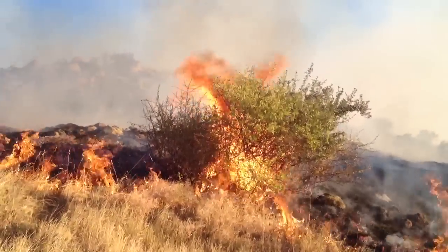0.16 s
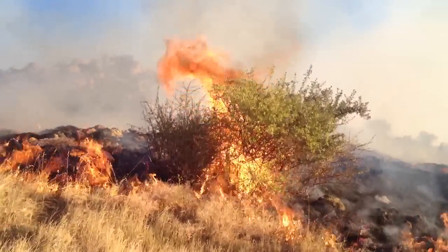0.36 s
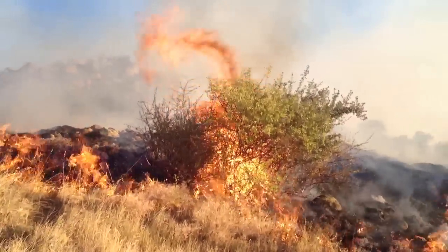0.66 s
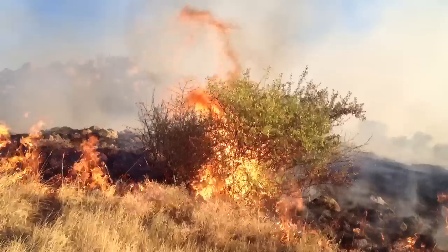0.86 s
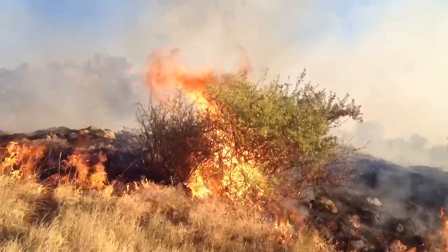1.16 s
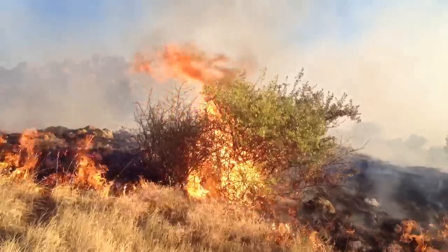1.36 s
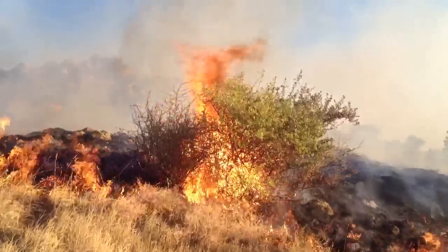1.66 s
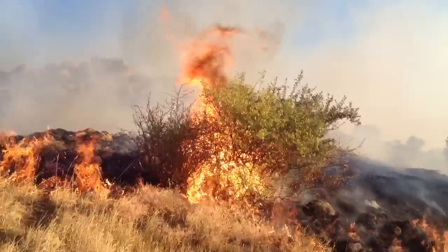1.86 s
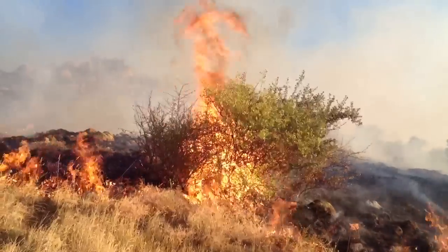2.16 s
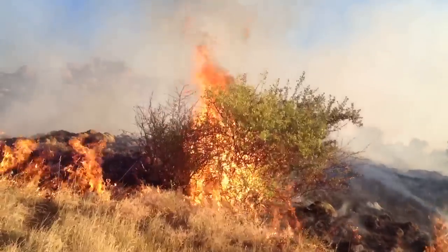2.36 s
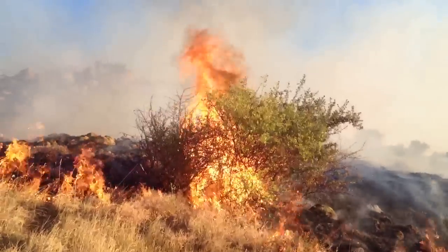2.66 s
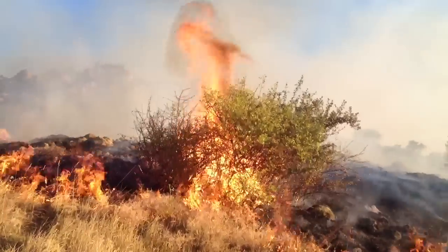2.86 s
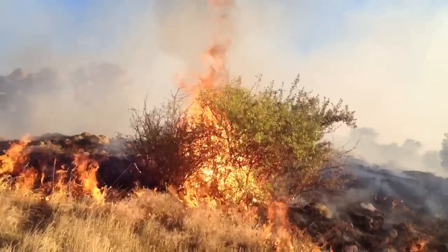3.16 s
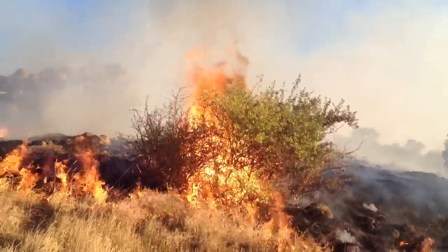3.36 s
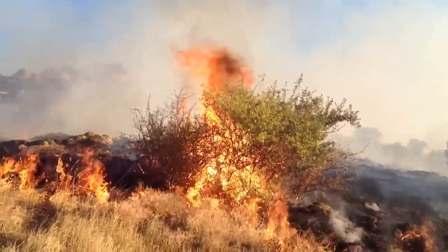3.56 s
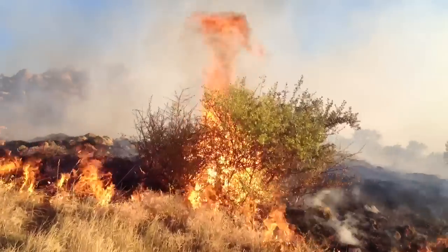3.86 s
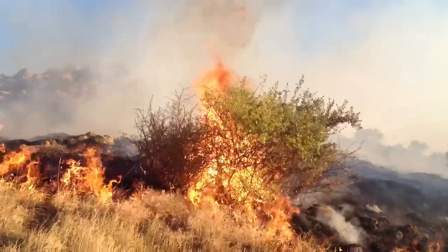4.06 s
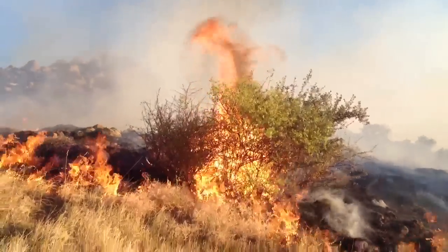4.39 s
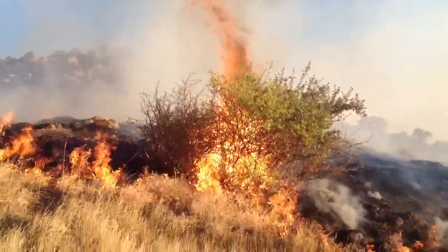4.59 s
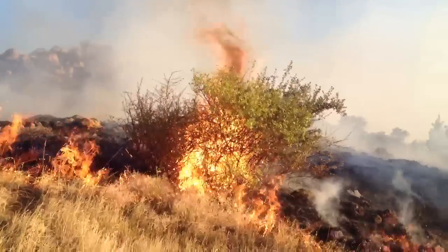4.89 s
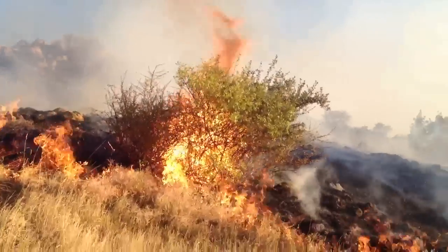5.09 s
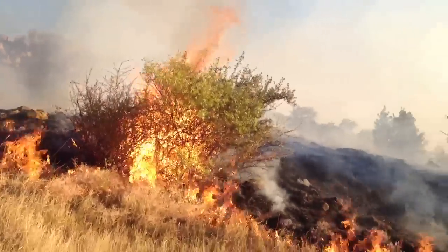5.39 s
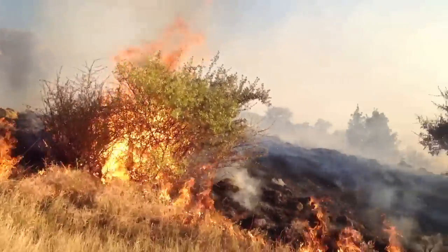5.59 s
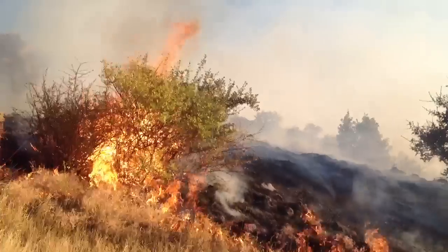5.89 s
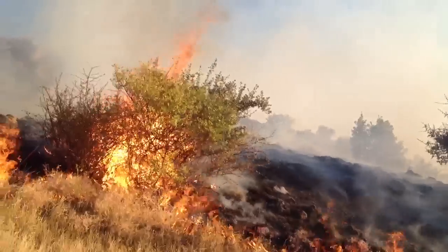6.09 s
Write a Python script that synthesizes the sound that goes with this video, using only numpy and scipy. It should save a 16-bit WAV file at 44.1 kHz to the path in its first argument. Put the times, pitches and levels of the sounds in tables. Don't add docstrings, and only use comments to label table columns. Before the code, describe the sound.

A continuous brush fire with no beginning or end: fast, crisp crackling, sizzling hiss and faint low flame flutter. The crackle starts strongest, eases, then swells and dips in flurries. Single stems pop and thicker twigs knock sharply, more often from three and a half seconds onward. The outdoor sound is dry and bright, mono from a phone, its colour changing slightly as it turns aside near the end.

```python
import sys
import numpy as np
from scipy import signal
from scipy.fft import rfft, irfft
from scipy.io import wavfile
from scipy.ndimage import uniform_filter1d

SR = 44100
rng = np.random.default_rng(int(sys.argv[2]) if len(sys.argv) > 2 else 0)


def persist_wave(psi):
    counts = np.round(np.clip(psi, -1, 1) * 32767).astype(np.int16)
    wavfile.write(sys.argv[1], SR, np.atleast_2d(counts).T)


def attenuation_scalar(level_db):
    decades = np.asarray(level_db, float) / 20
    return 10 ** decades


N = 275184
CRACK_N, LEAD_N = 1024, 128


def fire_db(s):
    # t/s, crackle/dB, flame/dB
    burning = [(0.0, -38, -51.5), (0.54, -43, -51), (0.82, -41, -51.5), (0.96, -46.5, -60),
               (1.34, -43.5, -53), (1.72, -43.5, -55.5), (2.12, -41.5, -51), (2.29, -39.5, -52),
               (2.52, -45.5, -50.5), (2.75, -44, -51.5), (3.37, -43, -52.5), (3.84, -42, -53.5),
               (4.64, -40.5, -51), (4.81, -41.5, -51), (5.2, -43, -50.5), (5.6, -41.5, -50.5),
               (5.91, -44, -51.5), (6.24, -42.5, -52)]
    at_s, fierce_db, flame_db = np.transpose(burning)
    return np.interp(s, at_s, fierce_db), np.interp(s, at_s, flame_db)


def bursts(count, crack_s, tail_s, tail_db, echo_s, echo_db, swell_db):
    t = (np.arange(CRACK_N) - LEAD_N) / SR
    vary = np.exp(0.3 * rng.standard_normal((count, 3)))
    noise = rng.standard_normal((count, 2, CRACK_N))
    noise[:, 0, LEAD_N] = 2 * np.sign(noise[:, 0, LEAD_N])
    tear = (t >= 0) * np.exp(-abs(t) / (crack_s * vary[:, :1])) * noise[:, 0]
    bounce = np.array([np.roll(one, int(echo_s * k * SR)) for one, k in zip(tear, vary[:, 2])])
    scatter = attenuation_scalar(tail_db) * np.exp(-abs(t) / (tail_s * vary[:, 1:2]))
    swell = attenuation_scalar(swell_db) * np.exp(-abs(t) / 0.00078)
    return tear + attenuation_scalar(echo_db) * bounce + np.where(t < 0, swell, scatter) * noise[:, 1]


def crackle(per_s, spread_db, cap_db, kinds=12):
    out = 0
    flurry = attenuation_scalar(3 * walk(12))
    for shape in bursts(kinds, crack_s=0.0002, tail_s=0.0025, tail_db=-8, echo_s=0.002, echo_db=-7, swell_db=-13):
        fired = rng.random(N) < per_s / kinds / SR * flurry
        size = attenuation_scalar(np.minimum(spread_db * rng.exponential(size=N), cap_db))
        centre_hz = min(4000 * np.exp(0.78 * rng.standard_normal()), 9000)
        tint = shape + 1.3 * band(shape, centre_hz / 1.03, centre_hz * 1.55)
        out = out + signal.oaconvolve(fired * size, tint / np.linalg.norm(tint))[:N]
    return out


def snaps(s, levels_db, bands_hz, trim_db, crack_s, tail_db, knock_hz):
    cracks = bursts(len(s), crack_s, 0.0026, tail_db, echo_s=0.0018, echo_db=-11, swell_db=-21)
    cracks = port(cracks, s[:, None])
    for one, hz in zip(cracks, knock_hz):
        one += 5 * band(one, hz / 1.42, hz * 1.36, order=1)
    sound = 0
    for (lo_hz, hi_hz), db, trim in zip(bands_hz, levels_db, trim_db):
        part = band(cracks, lo_hz, hi_hz, order=2 if lo_hz < 1000 else 3)
        rms = np.sqrt(np.sum(part[:, :LEAD_N + SR // 230] ** 2, axis=1) * 200 / SR)
        sound = sound + part * (attenuation_scalar(db + trim) / rms)[:, None]
    out = np.zeros(N + CRACK_N)
    for at, one in zip((s * SR).astype(int), sound):
        out[at:at + CRACK_N] += one
    return out[LEAD_N:N + LEAD_N]


def far_stalks():
    count, scatter_db = 170, 2
    chance = rng.random((count, 3))
    s = (np.arange(count) + 2 * chance[:, 0]) / (count + 2) * N / SR
    fierce_db, _ = fire_db(s)
    aside = turned(s)
    body_db = fierce_db - 6.5 + 4 * aside + scatter_db * (4 * chance[:, 1] - 2)
    treble_db = fierce_db + 2.5 - 0.5 * aside + scatter_db * (4 * chance[:, 2] - 2)
    return np.transpose([s, body_db, treble_db])


def stalks():
    # t/s, body/dB, treble/dB
    near_stems = [(0.2853, -39.5, -32), (0.4304, -42, -36), (0.7891, -44, -33.5), (2.0751, -46, -28),
                  (2.2315, -41, -32.5), (2.2414, -51, -32), (2.2986, -41, -35), (2.3149, -46, -31.5),
                  (2.3389, -39, -32), (2.3595, -37, -34), (2.4872, -39.5, -34), (3.2443, -40, -31.5),
                  (3.7514, -48, -30.5), (3.8028, -39.5, -27), (3.8383, -38.5, -38), (3.9969, -50, -31.5),
                  (4.1427, -41, -33), (4.4232, -39.5, -34.5), (4.4613, -39, -36), (4.6603, -35.5, -35),
                  (4.7201, -40, -45), (4.9518, -32, -32), (5.2295, -32.5, -33), (5.4176, -36.5, -38),
                  (5.4664, -39, -32), (5.5246, -37, -40), (5.5517, -38.5, -51), (5.7548, -37, -33),
                  (6.0417, -41, -36), (6.1329, -36.5, -29.5),
                  (0.0224, -42, -54), (0.1551, -48, -39), (0.2287, -50, -39), (1.0093, -43.5, -39.5),
                   (1.2598, -49, -35.5), (1.2739, -45, -44), (1.6142, -43, -35), (1.6832, -45, -33.5),
                   (1.779, -43, -33), (1.8186, -44, -49), (5.762, -41, -38), (2.1736, -45, -34.5),
                   (2.1998, -47, -36), (2.3215, -50, -34), (2.4318, -41, -37), (2.5062, -54, -34),
                   (2.7028, -47, -33), (2.977, -40.5, -37), (4.9155, -48, -36), (3.075, -49, -34),
                   (3.229, -55, -38), (3.3225, -42, -36), (3.4877, -47, -39), (3.6996, -49, -37),
                   (4.6243, -36, -37), (4.7707, -39.5, -38.5), (4.8136, -43.5, -35), (5.4575, -43, -36),
                   (5.7884, -43, -36), (6.1549, -41, -40)]
    # low edge f/Hz, high edge f/Hz
    bands_hz = [
        (1400, 6500),
        (6500, 15400),
    ]
    s, *levels_db = np.vstack([near_stems, far_stalks()]).T
    ring_hz = 1700 * 3.5 ** rng.random(len(s))
    return snaps(s, levels_db, bands_hz, [2.2, 1.5], crack_s=0.00022, tail_db=-12, knock_hz=ring_hz)


def twigs():
    # t/s, knock f/Hz, knock/dB, crack/dB, tick/dB
    thick_twigs = [(0.1265, 1770, -34, -55, -53), (0.3218, 2010, -36.5, -38, -29),
                   (0.4927, 1890, -38, -36.5, -30), (0.6865, 1680, -34, -55, -53),
                   (0.852, 2010, -21, -43, -23), (0.8548, 2220, -37, -43, -40),
                   (1.1796, 1790, -32, -44, -32.5), (2.6465, 1780, -33.5, -37, -34),
                   (3.3658, 2160, -38, -42, -33.5), (3.4485, 1460, -36, -40.5, -38),
                   (3.469, 1920, -38, -39.5, -35.5), (3.5118, 1710, -32.5, -34.5, -28),
                   (3.5725, 2120, -22.5, -30.5, -25.5), (3.5764, 2340, -41, -51, -40),
                   (3.708, 1700, -39, -39.5, -34.5), (3.776, 1990, -40, -48, -35),
                   (3.9553, 1510, -37, -41.5, -39), (4.1282, 2100, -37, -40.5, -29.5),
                   (4.6312, 2150, -39, -46, -36), (4.7442, 1740, -39, -36.5, -49),
                   (4.8899, 2070, -35.5, -44, -28.5), (4.9768, 1210, -25, -27, -25.5),
                   (5.7035, 1970, -31.5, -31.5, -32), (6.0461, 1750, -33.5, -50, -38)]
    # low edge f/Hz, high edge f/Hz
    bands_hz = [
        (480, 3300),
        (3300, 5400),
        (7000, 10000),
        (10000, 15400),
    ]
    s, knock_hz, knock_db, crack_db, tick_db = np.transpose(thick_twigs)
    levels_db = [knock_db, crack_db, tick_db, tick_db - 4]
    return snaps(s, levels_db, bands_hz, [1.05, 1.2, 1.3, 0.3], crack_s=0.0001, tail_db=-20, knock_hz=knock_hz)


def hiss():
    together = walk(18)
    out = attenuation_scalar(2.5) * band(rng.standard_normal(N), 10200, 16800)
    for hz in 250 * 2.0 ** np.arange(6):
        flicker = attenuation_scalar(0.72 * together + 0.85 * walk(17))
        out = out + band(rng.standard_normal(N), hz, min(2 * hz, 17000)) * flicker
    return out


def bed():
    t = np.arange(N) / SR
    fierce_db, flame_db = fire_db(t)
    low_db = -49 + 0.42 * (fierce_db - fierce_db.mean()) + 0.32 * (flame_db - flame_db.mean())
    low_db = low_db + 1 * turned(t)
    mix = level(crackle(per_s=1000, spread_db=4.3, cap_db=16), 0) + level(hiss(), -6)
    mix = port(flat(mix)[None], t)[0]
    below = signal.sosfilt(signal.butter(2, 3000, fs=SR, output="sos"), mix)
    above = signal.sosfilt(signal.butter(2, 3000, "high", fs=SR, output="sos"), mix)
    return attenuation_scalar(low_db) * steady(below) - attenuation_scalar(fierce_db) * steady(above)


def roar():
    # f/Hz, level/dB per Hz
    roar_colour = [(15, -54), (25, -33), (49, -27.5), (115, -4.5), (146, 1), (195, 1), (389, -12.5),
                   (500, -13), (650, -32), (1100, -120)]
    noise = signal.fftconvolve(rng.standard_normal(N), response(roar_colour, size=16384))[:N]
    _, flame_db = fire_db(np.arange(N) / SR)
    return attenuation_scalar(flame_db) * level(noise * attenuation_scalar(0.66 * walk(15)), 0)


def puffs():
    # t/s, level/dB, start f/Hz, end f/Hz, length/s
    gusts = [
        (2.082, -35, 280, 169, 0.038),
        (2.089, -39, 140, 95, 0.04),
        (2.131, -47.5, 200, 151, 0.062),
        (2.14, -46.5, 125, 85, .09),
    ]
    out, t = 0, np.arange(N) / SR
    for s, db, start_hz, end_hz, length_s in gusts:
        age = np.clip((t - s) / length_s, 0, 3)
        hz = end_hz + (start_hz - end_hz) * np.exp(-1.5 * age)
        hz = hz * (1 + 0.0997 * walk(110))
        shape = np.minimum(age * 8, 1) * np.exp(-age ** 4) * attenuation_scalar(1.5 * walk(90))
        out = out + attenuation_scalar(db) * shape * np.sin(2 * np.pi * np.cumsum(hz) / SR)
    return out


def phone_position(s):
    # t/s, position/step
    turning = [
        (0, 0),
        (3.2, 0.52),
        (3.6, 1.15),
        (4.55, 1),
        (4.8, 2.06),
        (4.92, 2.5),
        (5.04, 2.5),
        (6.24, 4),
    ]
    return np.clip(np.interp(s, *np.transpose(turning)), 0, 3)


def turned(s):
    return phone_position(s) / 3


def port(x, s):
    # f/Hz, level/dB per Hz
    ahead = [(180, -30), (300, -5.5), (397, -10.5), (619, 0), (903, -9.5), (1080, -3.5), (2310, -0.5),
             (2760, -12), (3600, -11.5), (4680, -4), (6500, -1.5), (8460, 8), (9810, -1), (11800, 5),
             (15300, -4.5)]
    # f/Hz, level/dB per Hz
    leaning = [(180, -32), (300, -11.5), (694, -3), (903, -12), (1140, -6), (1860, -9.5), (2350, -4),
               (2860, -16), (4600, -5.5), (5890, -17.5), (8320, 4.5), (10100, -5.5), (11800, -1.5),
               (15300, -7.5)]
    # f/Hz, level/dB per Hz
    midway = [(180, -22), (300, -3), (445, -10), (599, 1.5), (874, -11), (2310, -8.5), (3210, -18.5),
              (8050, 4), (9500, -12.5), (15300, 0.5)]
    # f/Hz, level/dB per Hz
    away = [(180, -21.5), (300, -3.5), (417, -4), (650, 4), (874, -7.5), (1080, -1), (1460, -8.5),
            (1830, -7.5), (5340, 1.5), (7790, 7), (13000, 0), (15300, 0.5)]
    # f/Hz, width/Hz, level/dB
    casing_modes = [(1427, 81, -3), (2440, 79, 1), (3067, 116, 6.5), (3720, 170, -2), (4770, 100, 6),
                    (4910, 200, -4)]
    colours = response(ahead, casing_modes), response(leaning, casing_modes), response(midway), response(away)
    position = phone_position(s)
    out = 0
    for k, colour in enumerate(colours):
        heard = signal.fftconvolve(x, colour[None])[:, :x.shape[1]]
        out = out + np.sqrt(np.clip(1 - abs(position - k), 0, 1)) * heard
    return out


def response(points, casing=(), size=4096):
    hz, db = np.transpose(points)
    grid_hz = np.maximum(np.arange(size // 2 + 1), 1) * SR / size
    db = np.interp(np.log(grid_hz), np.log(hz), db)
    db = db + sum(top * np.exp(-((grid_hz - f) / width) ** 2) for f, width, top in casing)
    cepstrum = irfft(db * np.log(10) / 20)
    cepstrum[1:size // 2] *= 2
    cepstrum[size // 2 + 1:] = 0
    out = irfft(np.exp(rfft(cepstrum)))
    return out / np.linalg.norm(out)


def band(x, lo_hz, hi_hz, order=2):
    return signal.sosfilt(signal.butter(order, [lo_hz, hi_hz], "bandpass", fs=SR, output="sos"), x)


def walk(rate_hz):
    k = int(SR / rate_hz)
    held = np.repeat(rng.standard_normal(N // k + 1), k)
    return 1.3 * uniform_filter1d(uniform_filter1d(held, k), k)[:N]


def level(x, db):
    return x * attenuation_scalar(db) / np.sqrt(np.mean(x ** 2))


def flat(x):
    bins = rfft(x)
    return irfft(bins / np.sqrt(uniform_filter1d(abs(bins) ** 2, size=1500)), N)


def steady(x):
    return x / np.sqrt(uniform_filter1d(x ** 2, size=SR // 3))


def scene():
    return (bed() + stalks() + twigs() + roar() + puffs())[None]


def top_cut(x):
    return signal.sosfilt(signal.butter(12, 16640, fs=SR, output="sos"), x)


def record(dry):
    cut = signal.sosfilt(signal.ellip(12, 0.2, 65, 15350, fs=SR, output="sos"), dry)
    return top_cut(cut)


dry = scene()
out = record(dry)
persist_wave(out)
```